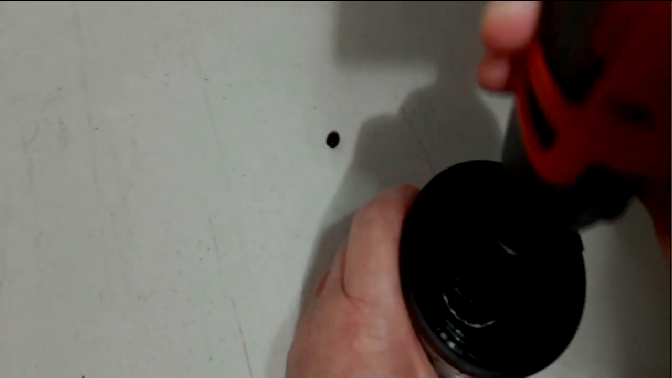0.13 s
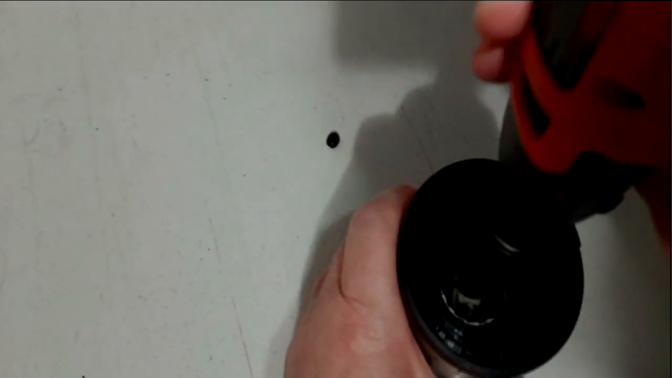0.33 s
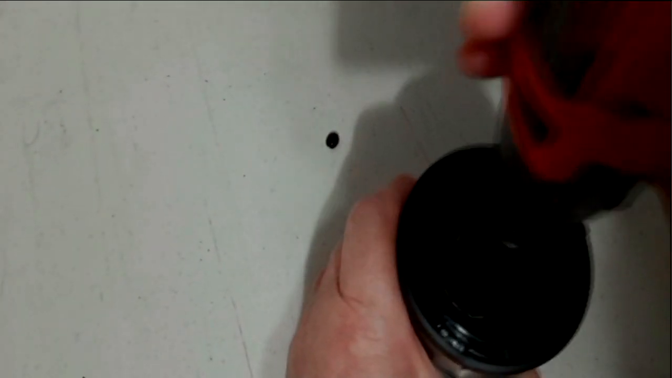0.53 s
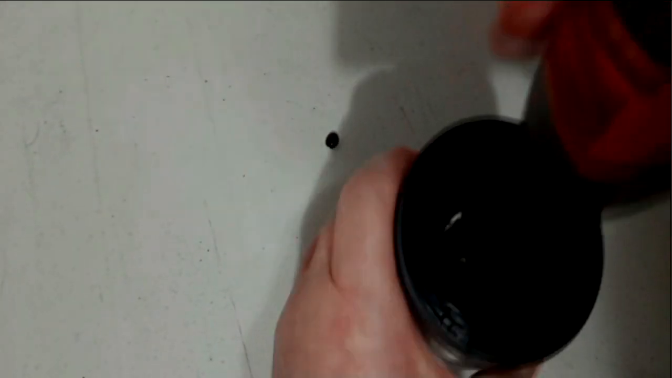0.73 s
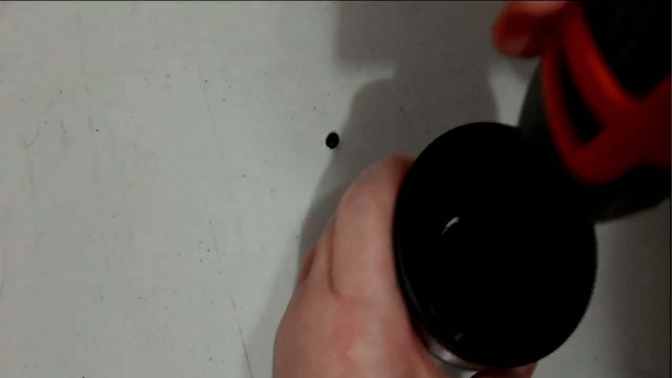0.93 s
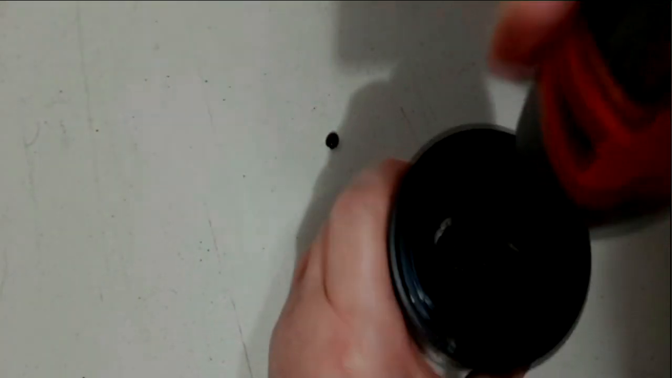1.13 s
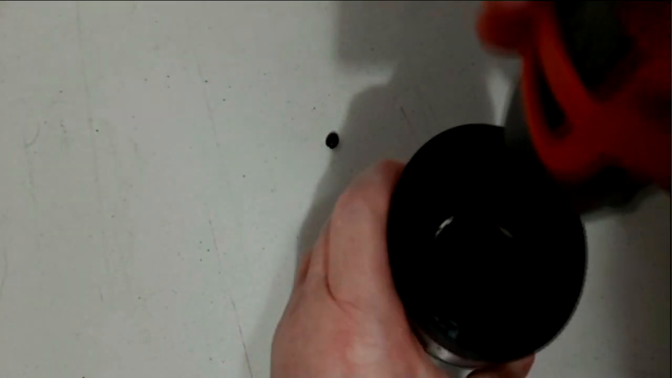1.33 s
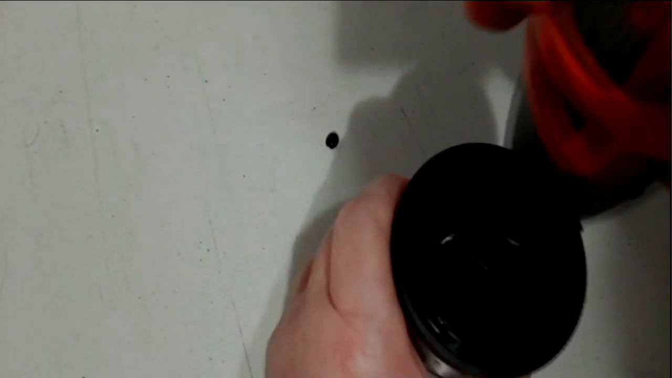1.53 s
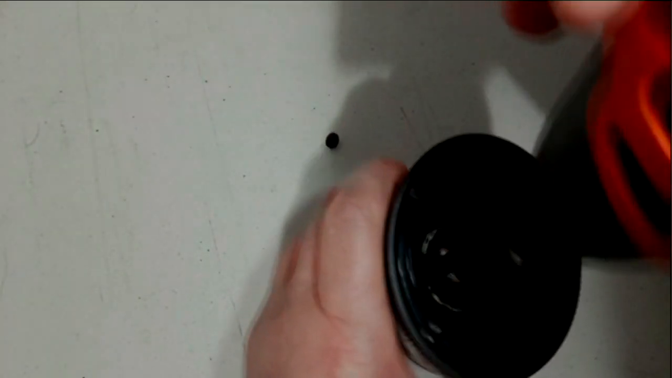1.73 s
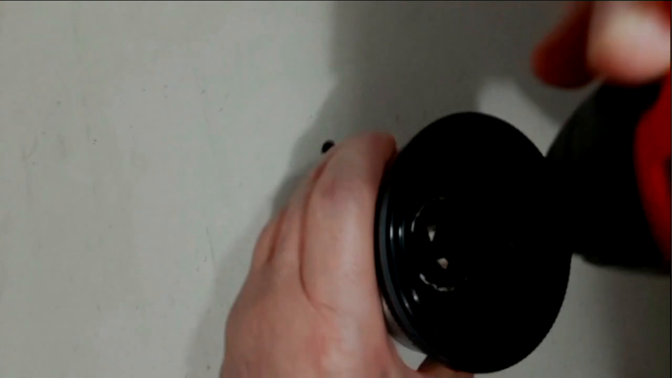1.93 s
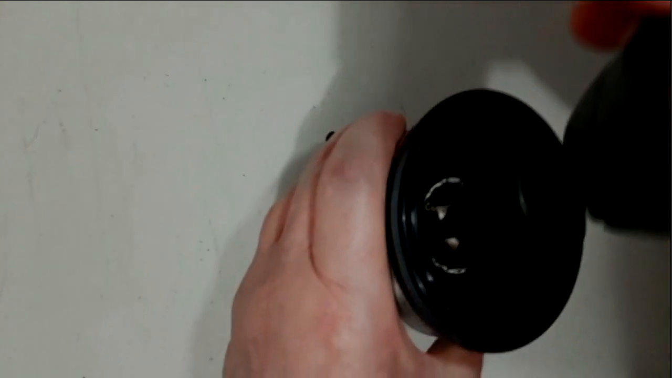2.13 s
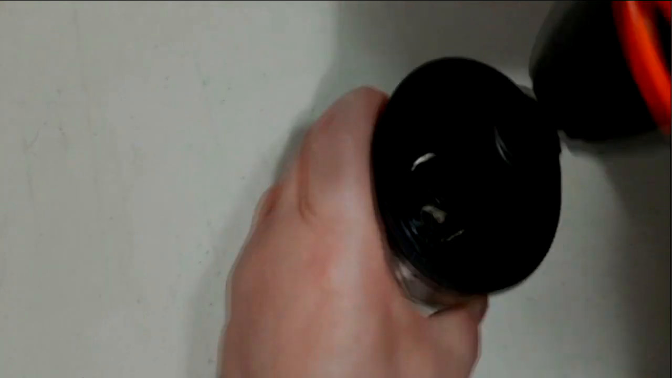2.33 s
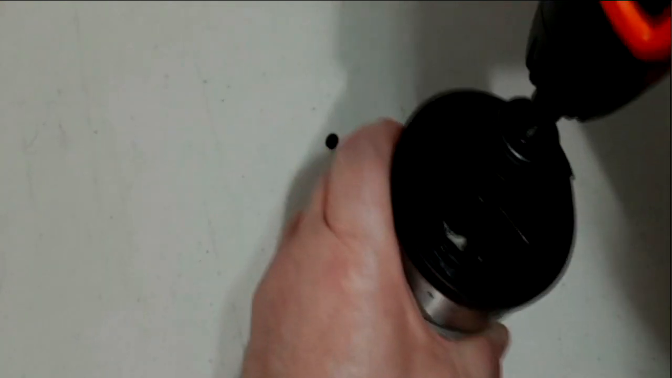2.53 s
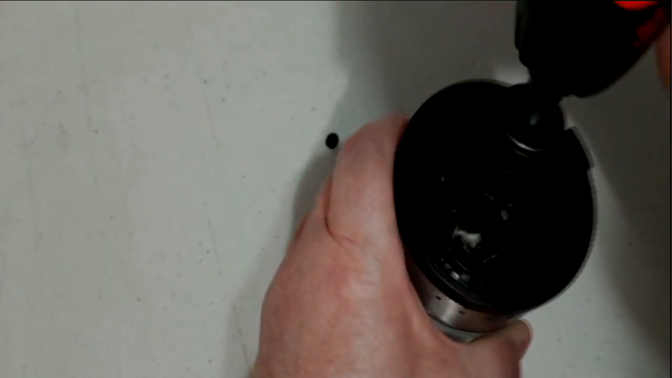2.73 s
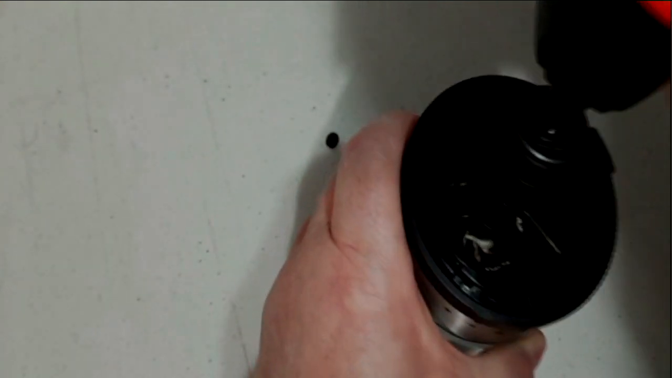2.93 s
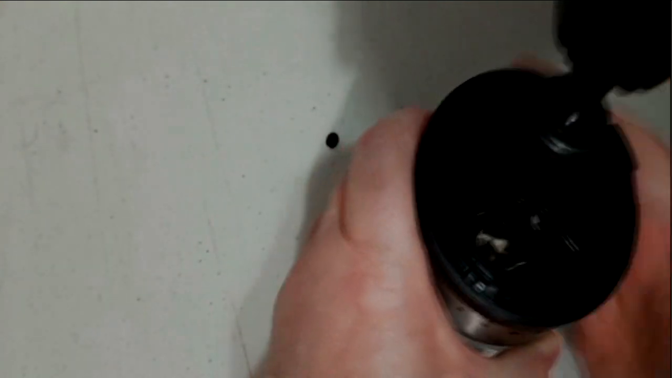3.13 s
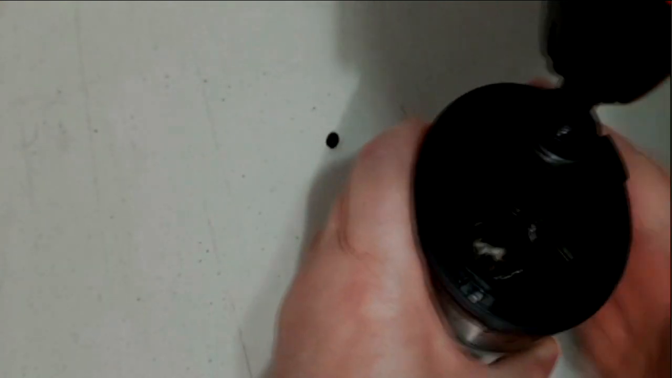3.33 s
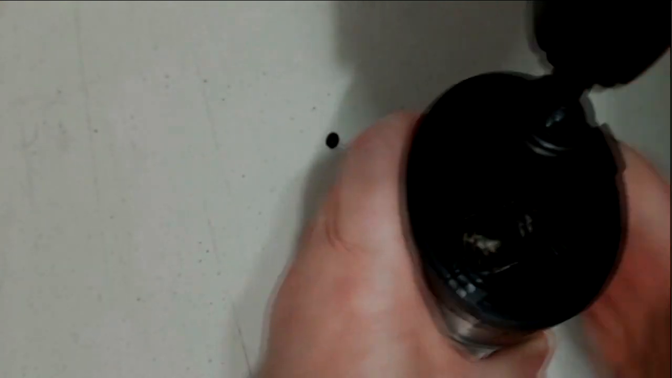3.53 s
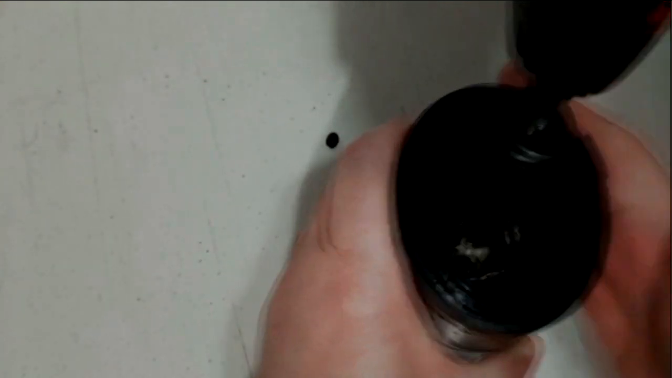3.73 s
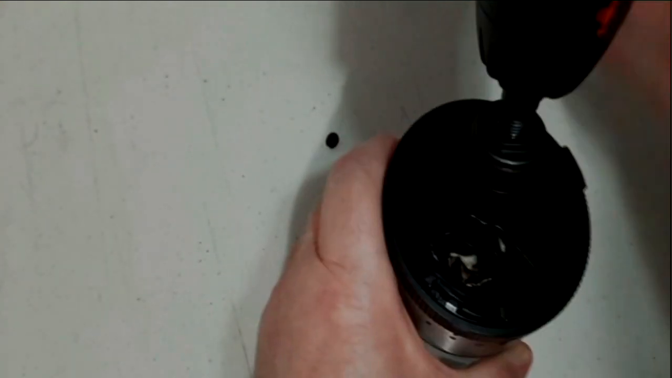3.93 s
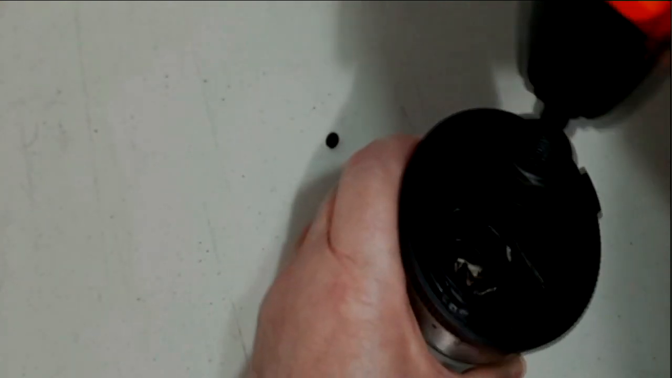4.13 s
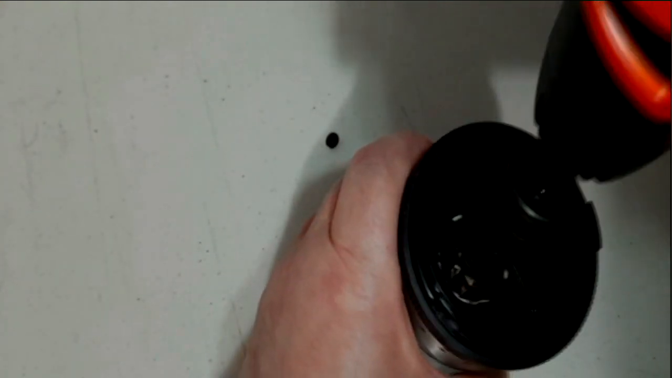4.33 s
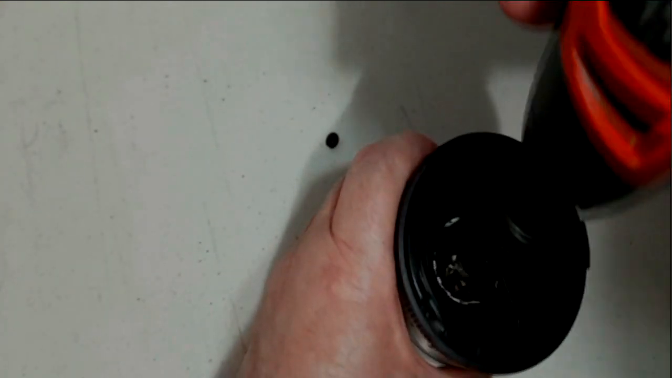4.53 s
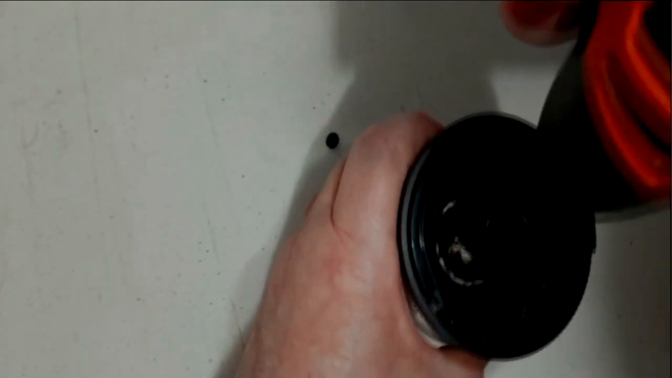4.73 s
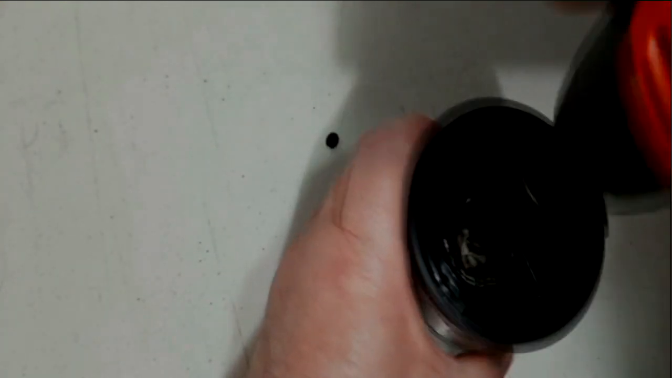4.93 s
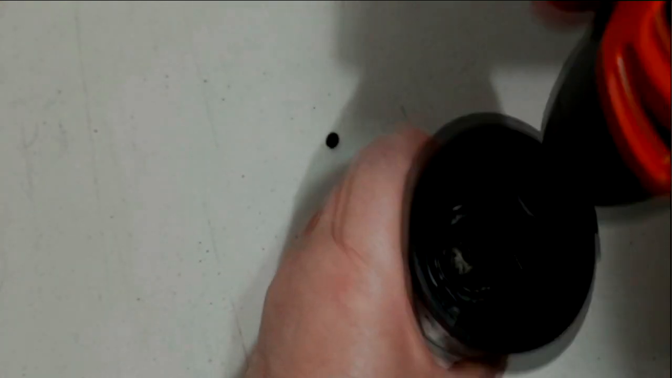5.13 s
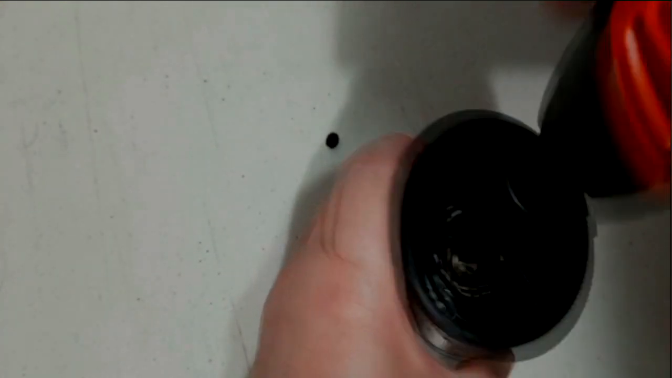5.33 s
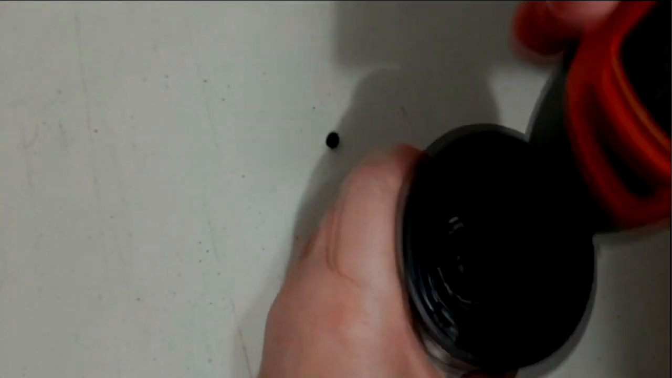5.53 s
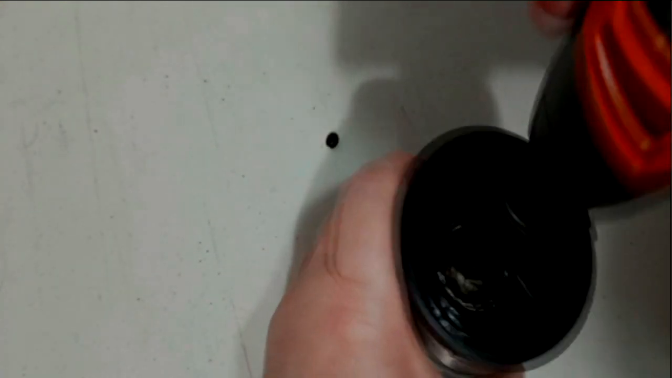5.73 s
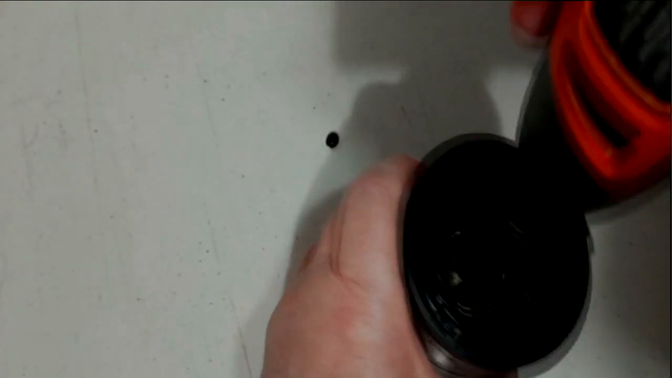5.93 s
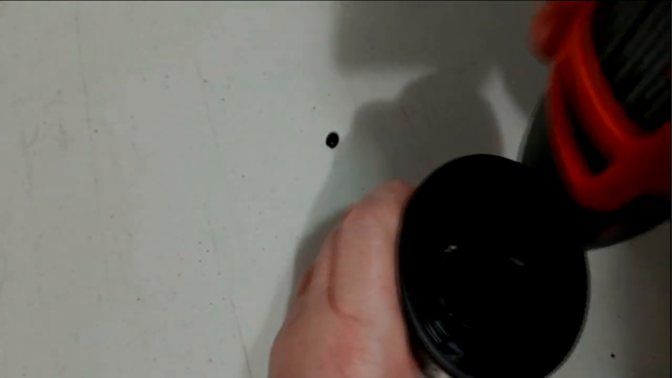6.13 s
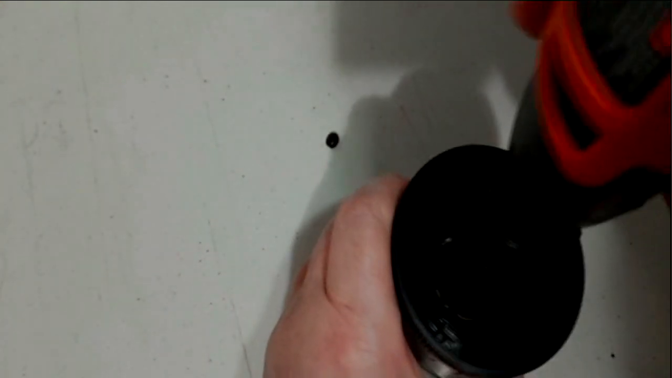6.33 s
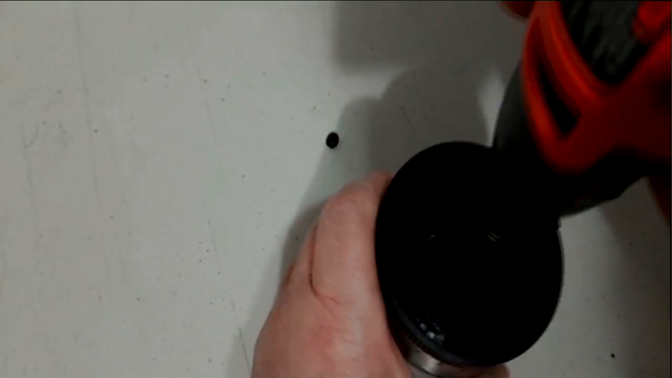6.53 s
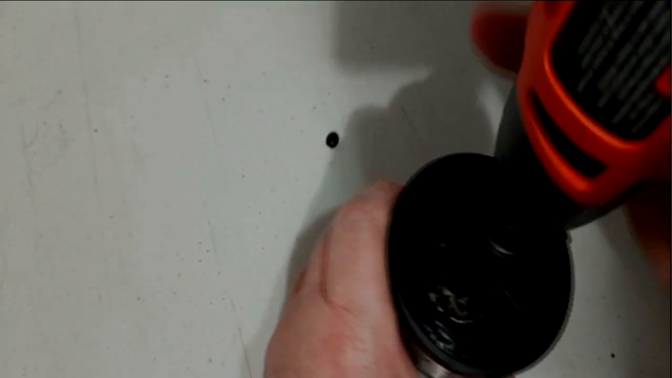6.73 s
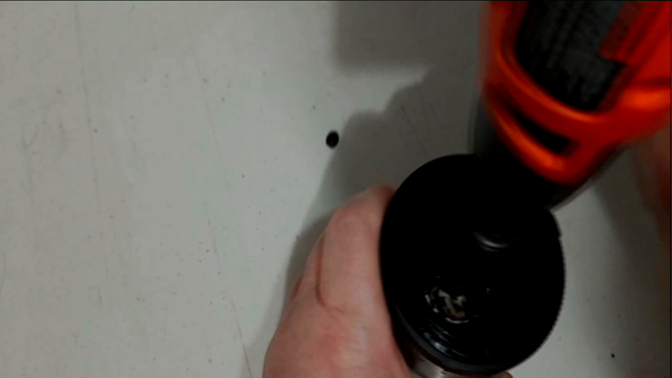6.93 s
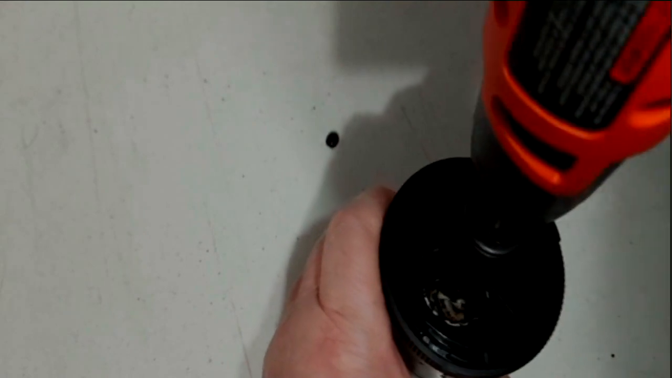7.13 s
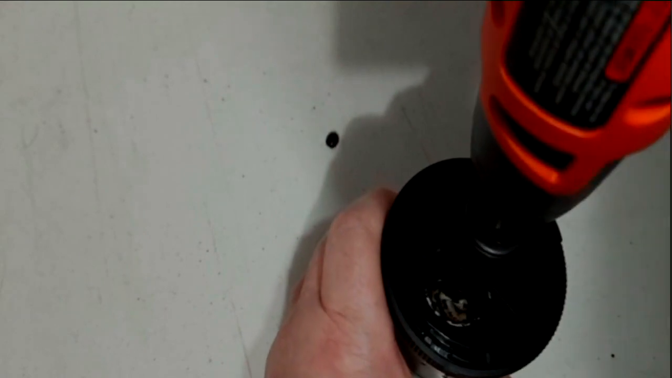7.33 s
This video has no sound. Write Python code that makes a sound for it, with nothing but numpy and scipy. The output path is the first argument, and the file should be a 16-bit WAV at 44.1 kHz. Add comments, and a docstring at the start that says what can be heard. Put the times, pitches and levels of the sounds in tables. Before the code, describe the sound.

Close up on a kitchen worktop, an electric screwdriver drives a coffee grinder with a wavering, rattly whine and the crunch of beans. The first short run stops, leaving a low room hum and scattered clicks and soft rubbing as the plastic tool is adjusted. A second run of about the same length follows and slows to rest, and the grinder knocks twice against the worktop with a low boom.

```python
"""A cordless screwdriver turns a hand coffee grinder on a kitchen worktop, in two runs.
Its gears whine and rattle, beans crunch in the burrs, and the worktop booms when the grinder shakes
or is knocked. Between and after the runs the tool's plastic clicks and rubs as it is handled.
An appliance hums; gain control ducks under the motor and lets the room swell back."""
import sys
import numpy as np
from scipy import signal
from scipy.fft import rfft, irfft, next_fast_len
from scipy.io import wavfile
from scipy.ndimage import uniform_filter1d, minimum_filter1d

SR = 44100
rng = np.random.default_rng(int(sys.argv[2]) if len(sys.argv) > 2 else 0)


def log_audio(samples):
    """Write samples as a 16-bit WAV file to the path given in sys.argv[1]."""
    # one column per channel
    frames = np.atleast_2d(samples).T
    # limit to full scale, then quantise
    limited = np.clip(frames, -1, 1)
    pcm = np.round(limited * 32767).astype(np.int16)
    wavfile.write(sys.argv[1], SR, pcm)


N = 325017
TIME = np.arange(N) / SR
RADIATES_HZ = 780  # the small housing radiates poorly below this

# stereo phase of the gearbox: f/Hz, lag of right behind left/rad
GEAR_PHASE = [(200, -1.5), (600, -0.58), (780, -0.76), (900, -3), (1100, -2), (1450, -4), (1750, -2.5),
              (3200, -2.5), (4100, -2), (5500, -3), (8000, -7)]
# stereo image of room and handling noise, wider in the treble: f/Hz, left-right coherence
AIR_COHERENCE = [(60, .92), (180, .9), (550, .4), (1650, .1), (15000, .05)]


def gain_of(db):
    """Decibels to a factor."""
    return 10 ** (np.asarray(db) / 20)


def unit_rms(x):
    """Scales to rms 1."""
    return x / np.sqrt(np.mean(x ** 2) + 1e-20)


def at_hz(points, hz):
    """Reads a curve of (f/Hz, value) on a log-frequency axis."""
    f, value = np.transpose(points)
    return np.interp(np.log(hz + 1), np.log(f + 1), value)


def follow(rows, column=1):
    """Automation curve through one column of rows that begin with t/s."""
    rows = np.array(rows)
    return np.interp(TIME, rows[:, 0], rows[:, column])


def swells(rows):
    """Bell-shaped envelopes from rows of (t/s, level/dB, length/s)."""
    return sum(gain_of(db) * np.exp(-(2 * (TIME - s) / length) ** 2) for s, db, length in rows)


def add(mix, s, sound):
    """Mixes a sound in at s seconds."""
    part = mix[..., round(s * SR):][..., :sound.shape[-1]]
    part += sound[..., :part.shape[-1]]


def wander(rate_hz):
    """Smooth random modulation of rms 1, rolling off above rate_hz."""
    hz = np.fft.rfftfreq(8192, N / 8192 / SR)
    slow = irfft(rfft(rng.standard_normal(8192)) / (1 + (hz / rate_hz) ** 4))
    return unit_rms(np.interp(np.linspace(0, 8191, N), np.arange(8192), slow))


def hiss(colour, coherence, phase=None, patchy_db=-1.5, bass_patchy_db=0):
    """Stereo noise with drifting spectral patches; colour(hz) gives its spectrum in dB."""
    frames, hz = N // 256 + 5, np.fft.rfftfreq(1024, 1 / SR)
    a, b, c, d, patches = rng.standard_normal((5, frames, 513))
    patches = unit_rms(uniform_filter1d(uniform_filter1d(patches, size=18, axis=0), size=4, axis=1))
    same = np.clip(at_hz(coherence, hz), 0, 1)
    left = a + 1j * b
    right = same * left + np.sqrt(1 - same ** 2) * (c + 1j * d)
    if phase is not None:
        right = right * np.exp(-1j * at_hz(phase, hz))
    depth_db = patchy_db + bass_patchy_db / (1 + (hz / 650) ** 4)
    spectra = np.array([left, right]) * gain_of(colour(hz) + depth_db * patches)
    return unit_rms(signal.istft(spectra.transpose(0, 2, 1), nperseg=1024, noverlap=768)[1][:, :N])


def band(x, low_hz, high_hz):
    """Gentle band-pass."""
    return signal.sosfilt(signal.butter(2, [low_hz, high_hz], "band", fs=SR, output="sos"), x)


def motor(spin_up_s=.024, let_go_s=.0099, coast_power=1.2, last_turns=.17):
    """Each run spins up, grinds and coasts to rest; gives share of full speed, release and loudness."""
    # on/s, off/s, coasting/s, driven level/dB, freewheeling level/dB, exponent of loudness with speed
    runs = [(-.5, 1.5, .26, -25.5, -23, 1.05), (4.792, 6.425, 0.385, -26, -28.5, 0.48)]
    pace, release, loudness = np.zeros((3, N))
    for on_s, off_s, coast_s, drive_db, freewheel_db, power in runs:
        spin_up = 1 - np.exp(-np.maximum(TIME - on_s, 0) / spin_up_s)
        turning = spin_up * np.clip(1 - (TIME - off_s) / coast_s, 0, 1) ** coast_power
        released = np.clip((TIME - off_s) / let_go_s, 0, 1) * (turning > 0)  # the gears go slack
        striking = spin_up ** 2.5 * turning ** power * np.tanh(turning / last_turns)
        pace += turning
        release += released
        loudness += striking * gain_of(drive_db + (freewheel_db - drive_db) * released)
    return pace, release, loudness


def housing(hz):
    """The housing colours the rattle: its left and right spectra in dB."""
    # rattle of gears and burrs: f/Hz, level/dB
    spectrum = [(30, -33), (100, -51.5), (290, -11.5), (400, -15), (570, -12), (900, -1.5), (1400, -1.5),
                (2600, 0.5), (3500, -1), (6500, -0.5), (7350, 0.5), (7800, -7), (9200, -4), (11500, 0),
                (16000, -9)]
    # resonances and hollows of the housing: f/Hz, width/Hz, gain/dB
    resonances = [(1090, 230, 2), (1350, 110, 2.5), (1680, 150, -2.5), (1970, 120, 1), (2270, 90, 1),
                  (2680, 230, -4.5), (3300, 170, .5), (4750, 250, -1.5), (6400, 200, 1.5)]
    # stereo balance: f/Hz, left minus right/dB
    balance = [(300, 1), (750, -3), (1130, 0), (1450, -4.5), (2000, -3.5), (2900, 0), (4000, -2),
               (6800, -2), (8200, 0), (15000, -1)]
    peaks = sum(db * np.exp(-((hz - f) / width) ** 2) for f, width, db in resonances)
    return at_hz(spectrum, hz) + peaks + np.array([.5, -.5])[:, None, None] * at_hz(balance, hz)


def buzz(planet, harmonics=96, size=4096, width=.67, drift=.433):
    """The same uneven teeth meet on every turn of the planet gears: a fine comb of harmonics."""
    shared, *sides = rng.standard_normal((3, harmonics)) + 1j * rng.standard_normal((3, harmonics))
    turn = np.arange(size) * 2 * np.pi / size
    angle = planet + drift * wander(6.8) / harmonics
    strikes = [np.interp(angle, turn, irfft(shared + width * own, size), period=2 * np.pi)
               for own in sides]
    padded = next_fast_len(N)
    hz = np.fft.rfftfreq(padded, 1 / SR)
    colour = gain_of(housing(hz)[:, 0]) * np.minimum(hz / RADIATES_HZ, 1) ** 2
    lag = np.exp(-1j * np.outer([0, 1], at_hz(GEAR_PHASE, hz)))
    return unit_rms(irfft(rfft(strikes, padded) * colour * lag, padded)[:, :N])


def rattle(teeth, speed, tooth_depth=.22, rough_db=-1.16, buzz_db=-10, dull_hz=1800):
    """Every meeting of teeth gives a puff of noise; gears that run out of true make it throb."""
    puffs = np.exp(tooth_depth * np.cos(teeth))
    planet, shaft = teeth / 16, teeth * 3 / 16
    throb = 1 + .034 * np.cos(planet) + .027 * np.cos(shaft)
    # stereo image of the gearbox: f/Hz, left-right coherence (below 0 counts as 0)
    coherence = [(200, -0.5), (450, 1.5), (740, -0.54), (1020, 1.2), (1220, 0.08), (1500, -9.5),
                 (2100, 0.27), (2650, 0.66), (3200, 0), (4500, -0.17), (9000, 0.05)]
    noise = hiss(housing, coherence, GEAR_PHASE, patchy_db=1.7, bass_patchy_db=2.0)
    noise *= unit_rms(puffs * throb * gain_of(rough_db * wander(350)))
    noise += gain_of(buzz_db) * buzz(planet)
    # slower teeth strike more softly and lose treble
    dull = signal.lfilter(*signal.butter(1, dull_hz, fs=SR), noise)
    return dull + (noise - dull) * speed ** .68


def whine(teeth, tooth_hz, released, jitter_rad=.09, sideband=.25, flutter_hz=42, fade_db=1.6):
    """The gears sing at orders of the tooth rate, broken up by the uneven load."""
    # orders and sidebands: multiple of the tooth rate
    orders = [1, 19 / 16, 29 / 16, 2, 47 / 16, 3, 51 / 16, 4, 5, 6, 7, 8]
    # mix, one row an order: left/dB, right/dB
    order_mix = [(-17.5, -18.5), (-27, -31), (-29, -23), (-21.5, -12.5), (-27, -23), (-13, -18), (-28, -27),
                 (-22, -15), (-25, -24), (-26, -22), (-31, -29), (-30, -33)]
    # level rides, shared by nearby sidebands: t/s, order 1/dB, 2/dB, 3/dB, 4/dB, 5 and up/dB
    rides = [(0, -1, 4, -1, -4, -2), (.1, -4, 2, -1, -4, -2), (.22, 2, 3.5, 2, -4, -2),
             (.4, -3, 3, 1, -4, -2), (.5, -7, 0, -6, -6, -3), (.6, -2, 1, 0, -3, -2), (.71, 5, 1, 5, -1, 0),
             (.83, 1, 3, 2, 2, 0), (.91, -6, -6, -4, -4, -4), (1, -1, -2, 0, -5, -2), (1.11, 7, 1, 5, 1, 0),
             (1.23, 1, -1, 3, 1, 0), (1.38, -1, -3, 1, -4, -2), (1.45, -6, -7, -4, -6, -4),
             (1.52, -2, -3, -3, -5, -4), (4.84, -2, 0, -8, 1, 4), (4.95, 4, 1, -8, 4, 7),
             (5.05, -3, 0, 0, 2, 2), (5.2, 3, 0.5, 3, 2, 1), (5.42, -4, 1, 0, 0, 0),
             (5.56, 2, -3, 3, 0, -1), (5.72, 1, -1, 2, 1, -1), (5.9, -6, -4, -3, -3, -4),
             (6.06, 4, -8, 5, -3, -4), (6.22, 1, -9, 3, -5, -5), (6.35, -4, -9, 1, -6, -6),
             (6.42, -3, -6, 4, -6, -5), (6.55, -2, 0, 0, -2, -4)]
    # how far the load breaks a tone up: f/Hz, flutter share (0 clean, 1 all flutter)
    breakup = [(1000, .45), (2000, .42), (3200, .68), (4200, .75)]
    # coasting leaves mostly the low resonance: f/Hz, gain/dB
    coasting_eq = [(450, -14), (750, 4), (1300, 4), (2000, 1), (3500, -7)]
    speed = tooth_hz / tooth_hz.max()
    shaken = teeth + (jitter_rad + (1 - speed) ** 2) * wander(49)  # slack blurs the pitch as gears slow
    planet = teeth / 16
    out = np.zeros((2, N))
    for order, sides_db in zip(orders, order_mix):
        hz = order * tooth_hz
        broken = at_hz(breakup, hz.max())
        scatter = (wander(flutter_hz) + 1j * wander(flutter_hz)) / np.sqrt(2)
        flutter = np.sqrt(1 - broken ** 2) + broken * scatter
        throb = 1 + sideband * np.cos(planet + 2 * np.pi * rng.random())
        tone = flutter * throb * np.exp(1j * order * shaken)
        sides = tone.real, (tone * np.exp(-1j * at_hz(GEAR_PHASE, hz))).real
        level_db = follow(rides, min(round(order), 5)) + released * at_hz(coasting_eq, hz)
        radiated = np.minimum(hz / RADIATES_HZ, 1) ** 2
        strength = radiated * np.sqrt(speed) * gain_of(level_db)
        for side, db in enumerate(sides_db):
            out[side] += gain_of(db) * strength * unit_rms(gain_of(fade_db * wander(15)) * sides[side])
    return out


def screwdriver(rattle_db=1.5, whine_db=4.2, uneven_db=.4):
    """Motor speed drives the whine and rattle of the gearbox; the load of the beans slows it."""
    # speed that the beans allow, one curve a run: t/s, tooth rate/Hz
    grinding = [
        [(0, 1062), (.05, 1038), (.08, 1070), (.13, 1078), (.22, 1038), (.3, 1060), (.36, 1032), (.51, 1094),
         (.54, 1042), (.65, 1054), (.67, 1036), (.77, 1066), (.84, 1010), (.86, 1014), (.94, 1098),
         (1.02, 1090), (1.05, 1064), (1.21, 1058), (1.24, 1038), (1.38, 1096), (1.48, 1108)],
        [(4.85, 972), (4.88, 958), (4.92, 942), (4.955, 948), (4.99, 975), (5.03, 1024), (5.15, 1024),
         (5.21, 1064), (5.27, 1036), (5.39, 1016), (5.45, 1072), (5.5, 1090), (5.61, 1054), (5.66, 1066),
         (5.73, 1028), (5.77, 1056), (5.81, 1028), (6, 1126), (6.11, 1116), (6.18, 1100), (6.24, 1144),
         (6.43, 1124)],
    ]
    # the gears bite hardest as the motor takes up the load: t/s, added drive/dB, length/s
    bite = [(4.905, -6, 0.16)]
    pace, released, loudness = motor()
    tooth_hz = np.maximum(follow(np.vstack(grinding)) * pace * (1 + .002 * wander(18)), 1)
    teeth = 2 * np.pi * np.cumsum(tooth_hz) / SR  # phase, one cycle a tooth
    gears = gain_of(rattle_db) * rattle(teeth, tooth_hz / tooth_hz.max())
    gears += gain_of(whine_db) * whine(teeth, tooth_hz, released)
    return gears * loudness * gain_of(uneven_db * wander(19)) * (1 + swells(bite))


def shudder(boom_hz=128, drift=.093, rock_hz=11.63, rock_db=2, held_at_s=.482, settle_s=.034):
    """The burrs catch and rock the grinder, which keeps the worktop booming until it is held firm."""
    # rumble under the boom: f/Hz, level/dB
    spectrum = [(30, 0), (70, -14), (140, 6), (200, -17), (330, -6), (450, -26.5), (1500, -59.5)]
    pitch_hz = boom_hz * (1 + drift * wander(19))
    boom = unit_rms(np.sin(2 * np.pi * np.cumsum(pitch_hz) / SR) * gain_of(2 * wander(27)))
    rumble = hiss(lambda hz: at_hz(spectrum, hz), AIR_COHERENCE)
    rocking_db = rock_db * np.cos(2 * np.pi * rock_hz * (TIME - held_at_s))
    settling = np.exp(-np.maximum(TIME - held_at_s, 0) / settle_s)
    level = gain_of(-25.5 - 13 * TIME + rocking_db) * settling
    return (gain_of(-4) * boom + gain_of(-7) * rumble) * level


def room_tone(rush_db=-49, waver_db=1.0, sway_rad=.28):
    """An appliance hums and wavers over the soft rush of the room."""
    # partials of the hum: f/Hz, level against the rush/dB
    partials = [(103.4, 3), (275, -15.5), (346, -18), (621.5, -30.5)]
    # rush of the quiet kitchen: f/Hz, level/dB
    spectrum = [(15, -24), (25, -36), (52, -34), (76, -8), (108, -9.5), (185, -26), (335, -17.5),
                (405, -24), (624, -20), (936, -26.5), (1290, -26), (6560, -42.5), (8360, -52), (13600, -49),
                (16000, -52.5)]
    hum = np.zeros(N)
    for hz, db in partials:
        tone = np.sin(2 * np.pi * hz * TIME + sway_rad * wander(17))
        hum += gain_of(db) * unit_rms(tone * gain_of(waver_db * wander(25)))
    rush = hiss(lambda hz: at_hz(spectrum, hz), AIR_COHERENCE, patchy_db=1.2)
    return gain_of(rush_db) * (hum + rush)


def beans(crunch_hz=(750, 2300), grit_hz=(5000, 14000), clump_db=-2.0):
    """A bean breaks as a short clump of cracks; its crumbs hiss."""
    # beans cracking in the burrs: t/s, level/dB, length/s
    crunches = [(.0232, -25.5, .0026), (.0335, -22.5, .0026), (.698, -26, .016), (.8113, -21.5, .0026),
                (.8271, -22, .0026), (.8359, -23.5, .0026), (.976, -17.5, .0028), (1.02, -24, .0023),
                (1.123, -22, .0026), (1.172, -22.5, .0026), (1.3513, -22, .003), (1.495, -25.5, .003),
                (1.517, -23, .003), (1.52, -33, .04), (5.5357, -24.5, .0026), (5.8045, -19.5, .0042),
                (5.808, -32, .035), (5.9645, -24.5, .0026), (6.0685, -22.5, .0026), (6.1586, -23.5, .0026)]
    # fine grit running through the burrs: t/s, level/dB, length/s
    grit = [(.19, -29.5, .04), (.51, -34.5, 0.099), (.78, -28, 0.071), (1.5, -28.5, 0.063),
            (5.69, -27.5, 0.092)]
    cracks = rng.standard_normal((2, N)) * gain_of(clump_db * wander(400))
    crunch = unit_rms(band(cracks, *crunch_hz)) * swells(crunches)
    return crunch + unit_rms(band(cracks, *grit_hz)) * swells(grit)


def clicks(slip_s=.0018, rise_s=.00052, rebound_s=.002, snap_t60=.012, chatter_t60=.17, part_t60=.017):
    """Plastic slips for a moment, snaps home, bounces once, chatters and rings in the shell."""
    # t/s, level/dB, treble/dB (flat at -19), mids/dB (flat at -17), struck part's f/Hz, its level/dB
    cues = [(1.862, -38.5, -42, -20, 2800, 2), (1.908, -37, -34, -14, 5900, -6),
            (2.34, -43.5, -35, -24, 6130, 5), (2.397, -36.5, -41, -19.5, 2200, -2),
            (3.183, -24, -41, -29, 3300, -5), (3.3773, -22, -33, -24, 2860, -8),
            (3.573, -23, -25.5, -21, 5500, -29), (3.792, -21.5, -33, -25, 3890, 3.5),
            (4.246, -36, -26.5, -24.5, 2720, -1), (4.563, -44, -33, 2, 1300, -13),
            (4.803, -42, -28.5, -25, 1000, -16), (6.727, -28, -53, -8, 2390, -18),
            (6.822, -43.5, -31, -21, 3700, -11.5), (6.98, -30.5, -69.5, -6, 2530, -2),
            (7.285, -38, -35, -9, 2800, -9)]
    # noise of a snap: f/Hz, level/dB
    spectrum = [(88, -36.5), (150, -9.5), (309, 4), (759, -7), (1630, -10), (1790, -5), (2140, -10.5),
                (3840, -13), (6910, -7), (8730, -14), (14000, -7.5), (16000, -14)]
    # modes of the plastic shell: f/Hz, level/dB, t60/s
    shell_modes = [(1854, -15.5, 0.044), (4300, -20, 0.13), (5200, -30, 0.1), (5400, -25, 0.068),
                   (6390, -8, 0.038), (6800, -17, 0.056)]
    out, t = np.zeros((2, N)), (np.arange(8192) - 512) / SR
    hz, after = np.fft.rfftfreq(len(t), 1 / SR), np.maximum(t, 0)
    slip = gain_of(-10) * np.exp(-abs(t) / slip_s)
    rise = 1 - np.exp(-after / rise_s)
    snap = gain_of(-60 * after / snap_t60)
    rebound = (t > rebound_s) * gain_of(-3 - 60 * abs(t - rebound_s) / snap_t60)
    chatter = gain_of(-15 - 60 * after / chatter_t60)
    force = slip + rebound + rise * (snap + chatter)
    for s, db, treble_db, mids_db, part_hz, part_db in cues:
        tilt = gain_of(at_hz([(1200, mids_db + 17), (3500, .0046), (9000, treble_db + 19)], hz))
        shared, *own = rng.standard_normal((3, len(t)))
        noise = unit_rms(irfft(rfft(.9 * shared + np.array(own)) * gain_of(at_hz(spectrum, hz)) * tilt))
        ring = np.zeros_like(noise)
        for f, mode_db, t60 in shell_modes:
            envelope = np.interp(f, hz, tilt) * gain_of(mode_db - 60 * after / t60)
            ring += envelope * np.sin(2 * np.pi * (f * t + rng.random((2, 1))))
        part = np.sin(2 * np.pi * (part_hz * t + rng.random((2, 1)) / 4))
        ring += gain_of(part_db - 60 * after / part_t60) * part
        add(out, s + t[0], gain_of(db + 1) * (noise * force + ring * rise))
    return out


def thumps(rise_s=.0083):
    """At a knock, worktop and grinder each swing up in about a cycle and ring out."""
    # knocks on the grinder: t/s, worktop level/dB, body level/dB
    knocks = [(1.867, -31, -30), (1.907, -38, -31), (2.338, -52, -41), (3.186, -53, -67), (3.38, -32, -56),
              (3.793, -37, -40), (6.727, -6.5, -29), (6.981, -7.5, -30)]
    # modes of the worktop: f/Hz, level/dB, t60/s
    worktop_modes = [(115.3, 3.5, 0.11), (140.7, -14.5, 0.25), (66, -8, 0.14)]
    # modes of the grinder's hollow body: f/Hz, level/dB, t60/s
    body_modes = [(203, -7, 0.22), (240, 6.5, 0.062), (283, -3, 0.2), (340, -27, 0.097), (585, -16, 0.1)]
    rise_cycles = rise_s * worktop_modes[0][0]
    out, t = np.zeros(N), np.arange(SR // 3) / SR
    for s, *levels_db in knocks:
        for db, modes in zip(levels_db, (worktop_modes, body_modes)):
            for hz, mode_db, t60 in modes:
                swing = np.sin(2 * np.pi * hz * t) * (1 - np.exp(-t * hz / rise_cycles))
                add(out, s, gain_of(db + mode_db - 60 * t / t60) * swing)
    return out


def hand_slide(squeak_db=-11, blur_rad=1.5):
    """Skin hisses over the tool's textured plastic, with a thin gliding squeak."""
    # the stroke of the hand: t/s, level/dB, squeak f/Hz
    stroke = [(2.39, -85, 11000), (2.43, -61, 11000), (2.6, -54.5, 10900), (2.75, -52.5, 11800),
              (2.87, -50, 11900), (2.95, -56.5, 10000), (3.02, -88, 9500)]
    # skin on plastic: f/Hz, level/dB
    spectrum = [(2500, -22), (4300, -8.5), (5500, 0), (7100, -0.5), (8200, -12), (12000, -5), (15500, -15)]
    level_db, squeak_hz = follow(stroke, 1), follow(stroke, 2)
    squeak = unit_rms(np.sin(2 * np.pi * np.cumsum(squeak_hz) / SR + blur_rad * wander(147.3)))
    skin = hiss(lambda hz: at_hz(spectrum, hz), AIR_COHERENCE)
    return gain_of(level_db) * (skin + gain_of(squeak_db) * squeak)


def rubs(catch_db=1.2):
    """Plastic slides on plastic with smooth dry friction as the tool is adjusted."""
    # adjusting moves: t/s, level/dB, length/s
    moves = [(3.205, -50, 0.091), (3.3, -48, 0.28), (3.815, -47, 0.12), (4.55, -61, 0.11),
             (4.806, -49, .025)]
    # plastic on plastic: f/Hz, level/dB
    spectrum = [(300, -10), (1500, 2), (4500, 0), (7200, 4), (8200, -7), (12500, 2.5), (16000, 0)]
    friction = hiss(lambda hz: at_hz(spectrum, hz), AIR_COHERENCE)
    return friction * gain_of(catch_db * wander(120)) * swells(moves)


def kitchen_reverb(x, density=.1, predelay_s=.005):
    """Sparse reflections that die band by band."""
    # decay of the kitchen: f/Hz, t60/s
    decay = [(200, 0.15), (1000, 0.16), (4000, 0.14), (9000, 0.152), (16000, 0.078)]
    taps = rng.standard_normal((2, SR // 2)) * (rng.random((2, SR // 2)) < density)
    taps[:, :round(predelay_s * SR)] = 0
    hz, t, spectra = signal.stft(taps, SR, nperseg=256)
    tail = signal.istft(spectra * gain_of(-60 * t / at_hz(decay, hz)[:, None]), SR, nperseg=256)[1]
    return signal.fftconvolve(x, tail / np.linalg.norm(tail[0]), axes=1)[:, :N]


def scene(drive_db=7.5, reverb_db=-7):
    """Tool, grinder and worktop up close; only the handling feeds the reverb."""
    drive = gain_of(drive_db) * (screwdriver() + beans() + shudder())
    handling = clicks() + rubs() + hand_slide()
    low_end = (thumps() + room_tone()) * gain_of([[-.4], [.4]])  # leans slightly right
    return drive + handling + gain_of(reverb_db) * kitchen_reverb(handling) + low_end


def record(dry, threshold_db=-28, max_cut_db=5, recover_db_per_s=27, attack_s=.25, hold_s=.88,
           low_cut_hz=39, high_cut_hz=16150):
    """Low cut; gain control that ducks under loud sounds, holds and creeps back; then a high cut."""
    dry = signal.sosfilt(signal.butter(3, low_cut_hz, "high", fs=SR, output="sos"), dry)
    power_db = 10 * np.log10(abs(uniform_filter1d((dry ** 2).mean(0), size=4000)) + 1e-12)
    over_db = np.clip(power_db - threshold_db, 0, max_cut_db)
    half = round(hold_s * SR / 2)
    held_db = -minimum_filter1d(-over_db, size=2 * half + 1, origin=half, mode="nearest")
    recovery_db = TIME * recover_db_per_s
    target_db = np.maximum.accumulate(held_db + recovery_db) - recovery_db
    pole = np.exp(-1 / (attack_s * SR))
    cut_db = target_db[0] + signal.lfilter([1 - pole], [1, -pole], target_db - target_db[0])
    high_cut = signal.firwin(511, high_cut_hz, window=("kaiser", 9), fs=SR)
    return signal.oaconvolve(dry / gain_of(cut_db), high_cut[None], "same")


dry = scene()
out = record(dry)
log_audio(out)
```